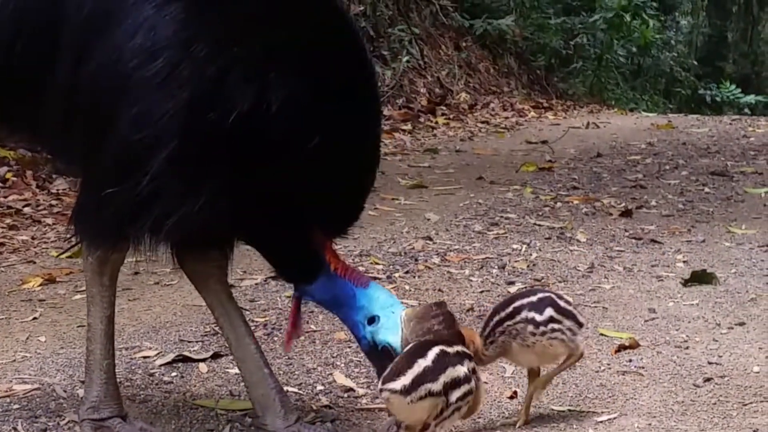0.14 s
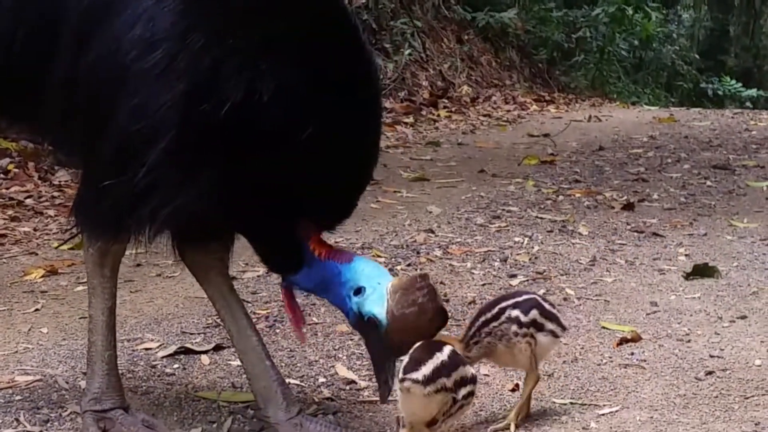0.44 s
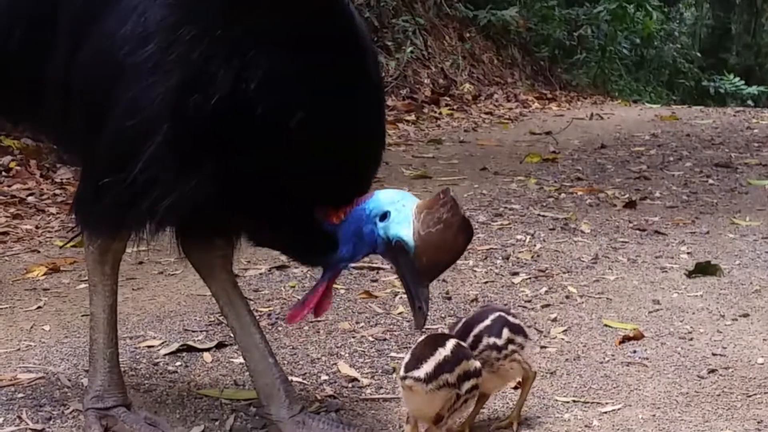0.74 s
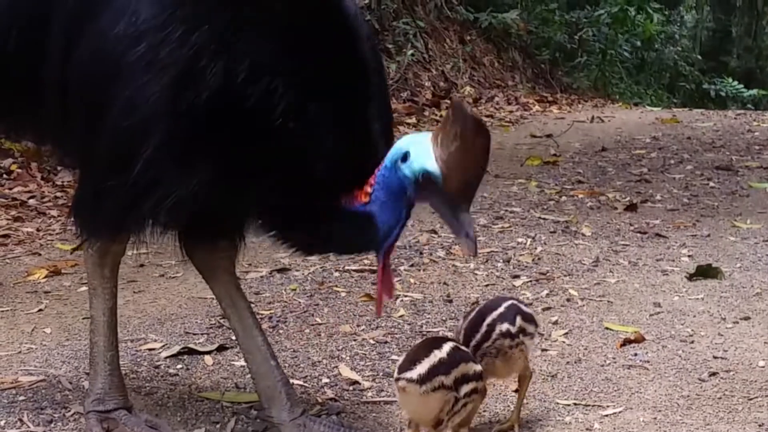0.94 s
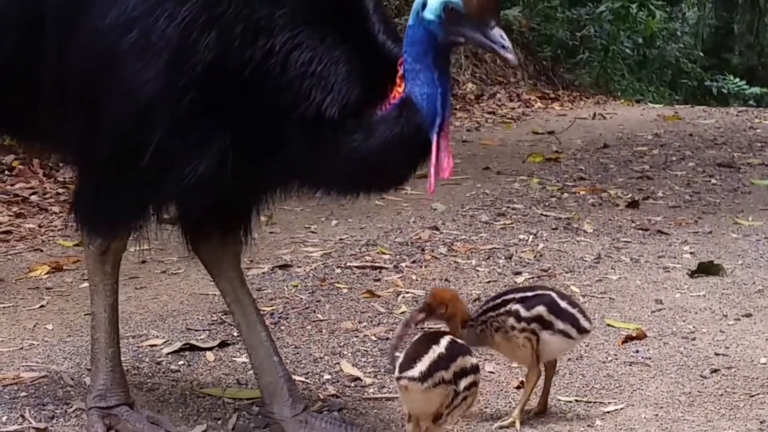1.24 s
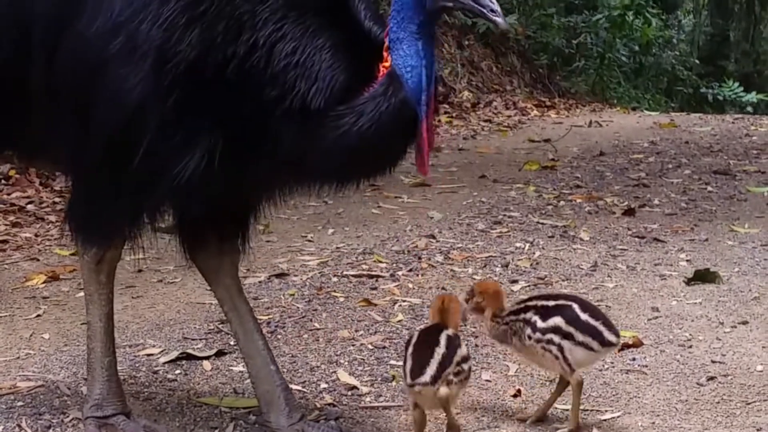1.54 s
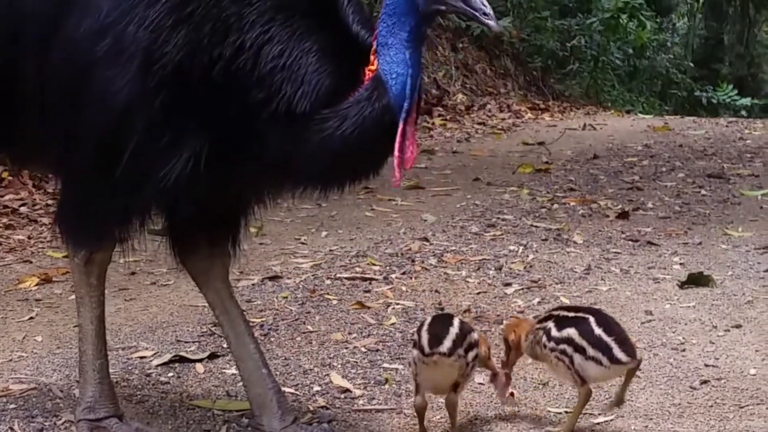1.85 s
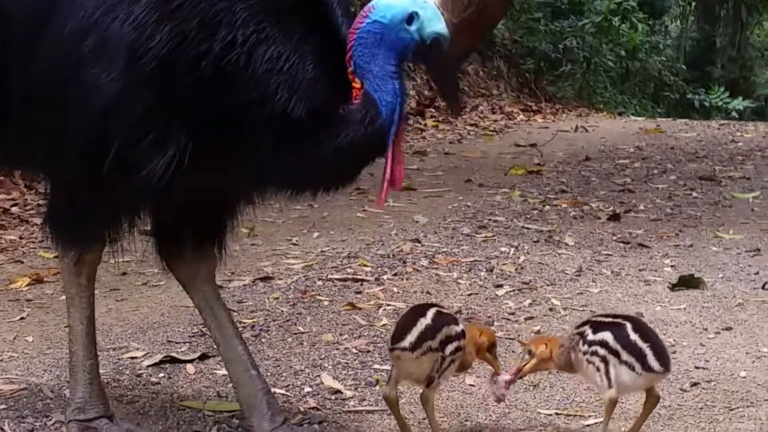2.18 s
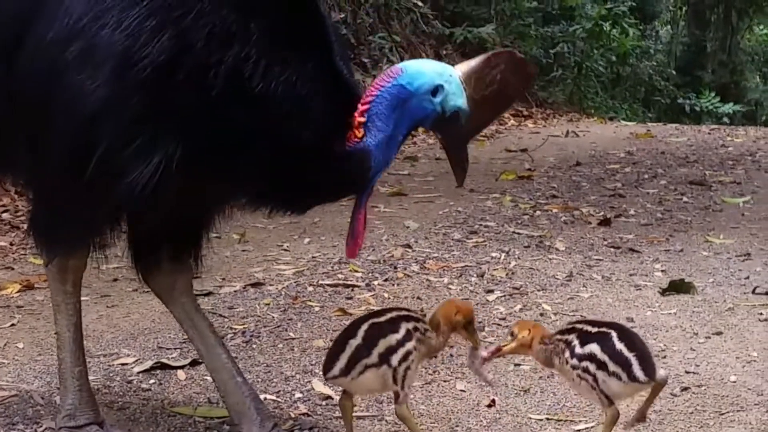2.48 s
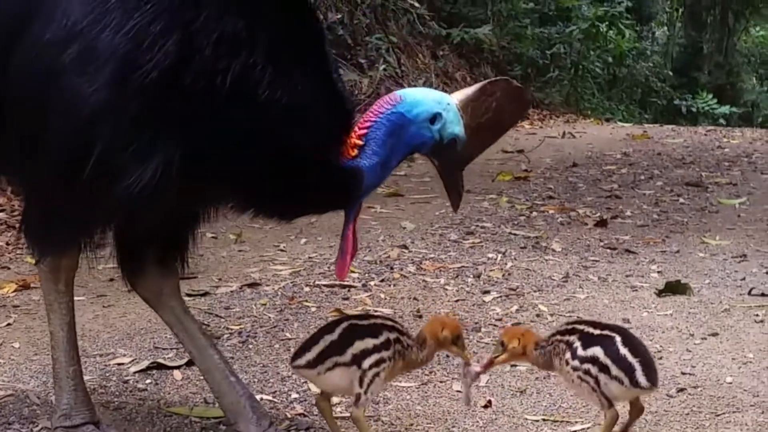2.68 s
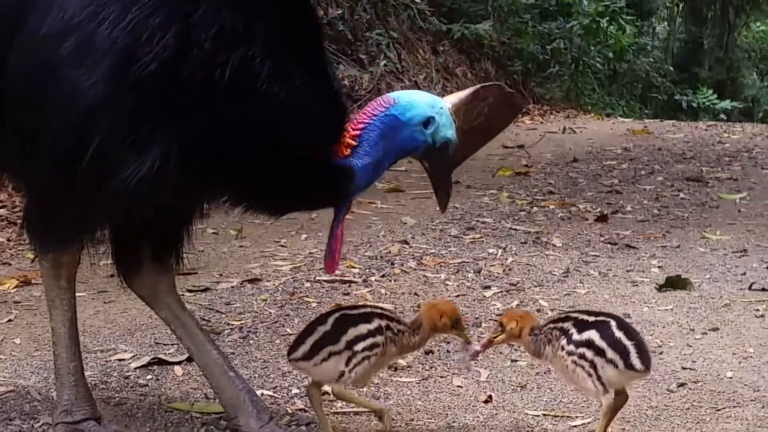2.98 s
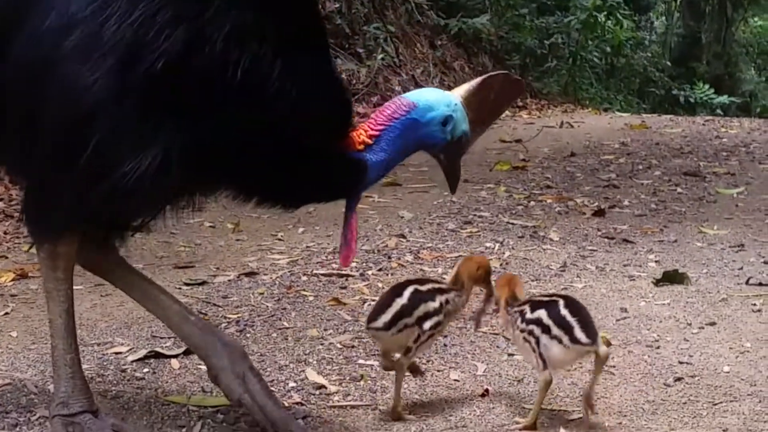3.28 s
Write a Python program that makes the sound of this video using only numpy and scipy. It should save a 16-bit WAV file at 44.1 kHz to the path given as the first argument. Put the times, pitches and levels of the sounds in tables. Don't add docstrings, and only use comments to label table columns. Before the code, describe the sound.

A dense, steady cicada chorus rings at about 4 to 6 kHz throughout, stronger on the left, with faint crickets above and soft forest air. Low wind buffets the stereo microphone in short left lumps and longer right swells, strongest around 1 to 2 seconds. A chick peeps thinly at 0.4, right; faint gravel ticks come at 0.9, 1.9 and 3.3; a large bird hums faintly low at 1.7.

```python
import sys
import numpy as np
from scipy import signal
from scipy.fft import rfft, irfft, next_fast_len
from scipy.io import wavfile
from scipy.ndimage import uniform_filter1d, map_coordinates

SR = 44100
rng = np.random.default_rng(int(sys.argv[2]) if len(sys.argv) > 2 else 0)


def volts(x):
    e = np.asarray(x, float) / 20
    return 10 ** e


def generate_wav(signal):
    frames = np.transpose(np.atleast_2d(signal))
    scaled = np.clip(frames, -1, 1) * 32767
    pcm = np.round(scaled).astype(np.int16)
    wavfile.write(sys.argv[1], SR, pcm)


N = 150822

# centre_hz, width_hz, level_db (per Hz)
CICADAS_LEFT = [(3550, 880, -86.7), (3900, 500, -82.9), (4100, 290, -76.3), (4270, 170, -77.0),
                (4420, 2000, -79.5), (4830, 420, -73.4), (5130, 370, -79.9), (5330, 450, -74.6),
                (5580, 310, -78.1), (5810, 280, -87.3), (6690, 1920, -87.4), (7110, 410, -83.2),
                (7280, 570, -86.3), (7860, 560, -100.4)]
CICADAS_RIGHT = [(3710, 1140, -94.9), (3970, 570, -83.2), (4070, 220, -83.6), (4290, 370, -84.6),
                 (4590, 300, -87.8), (4790, 410, -81.4), (5150, 540, -86.5), (5320, 360, -82.7),
                 (5570, 310, -86.7), (5830, 220, -101.8), (6640, 1660, -102.7), (7130, 320, -99.7),
                 (7230, 920, -103.0)]
# centre_s, length_s, level_db
WIND_LUMPS = [(.04, .09, -29), (.11, .1, -31), (.2, .12, -34), (.345, .07, -24), (.38, .1, -33),
              (.54, .08, -40), (.79, .07, -35), (1.06, .08, -33), (1.17, .08, -38), (1.22, .06, -28),
              (1.39, .09, -29), (1.46, .07, -31), (1.525, .09, -30), (1.8, .14, -33), (1.92, .09, -34),
              (2.01, .1, -32), (2.15, .12, -39), (2.398, .045, -26), (2.49, .09, -39), (2.667, .05, -34),
              (2.76, .08, -43), (3.16, .1, -42), (3.31, .08, -36), (3.37, .07, -34)]
# time_s, level_db
WIND_SWELL = [(0, -34), (.11, -44.5), (.18, -36.5), (.47, -40.5), (.72, -43.5), (1.0, -33.5), (1.1, -38),
              (1.17, -32), (1.44, -30), (1.6, -37.5), (1.77, -31.5), (1.95, -34.5), (2.25, -40.5),
              (2.54, -37), (2.86, -45.5), (3.06, -45), (3.18, -37), (3.42, -42)]
# centre_s, length_s, over_swell_db
WIND_PUFFS = [(0.366, 0.043, 3.5), (0.467, 0.036, 5.5), (0.575, 0.034, 6.5), (0.653, 0.061, 6.5),
              (1.02, 0.029, -6), (1.167, 0.056, -0.5), (1.417, .05, 1), (1.459, 0.015, 8),
              (1.664, 0.031, 2.5), (1.86, 0.039, 2.5), (1.932, .05, 4.5), (2.017, 0.02, 3),
              (2.153, 0.017, 3.5), (2.4, 0.05, 3), (2.704, .06, 2.5), (2.751, 0.07, 4.5),
              (3.205, 0.076, 2.5)]
# freq_hz, level_db (per Hz)
RUMBLE_LEFT = [(12, -20), (30, -8), (45, -4), (75, 0), (110, -4), (160, -11), (210, -21), (400, -50)]
RUMBLE_RIGHT = [(12, -36), (40, -7.5), (70, 2.5), (110, 1), (160, -4.5), (250, -19), (400, -30.5),
                (800, -54)]
# freq_hz, level_db
DEEP_PRESSURE = [(12, -15), (30, -11), (50, -7.5), (80, -8.5), (200, -41)]
# freq_hz, level_db
FLUTTER = [(80, 8), (150, -1), (220, 4), (320, -5.5), (450, -17), (900, -49.5)]
# time_s, pitch_hz, level_db
PEEP = [
    (.354, 1400, -78),
    (.366, 1540, -56),
    (.374, 1720, -70),
    (.386, 1870, -63),
    (.41, 2250, -71),
    (.422, 2120, -80),
    (.437, 2300, -70),
    (.46, 1570, -59),
    (.469, 1480, -76),
]
# start_s, level_db, pitch_hz, left_over_right_db
GRAVEL_TICKS = [
    (.935, -49, 1100, -5),
    (1.882, -54, 12500, -4),
    (1.942, -51, 12500, 1),
    (3.293, -57, 12000, 1),
]
# centre_hz, width_hz, level_db (per Hz)
CRICKET_BANDS = [
    (10950, 3400, -103),
    (10620, 2100, -103),
]
# freq_hz, level_db (per Hz)
AIR_SPECTRUM = [(150, -82), (400, -85), (650, -83.5), (1000, -88.5), (1500, -95.5), (3000, -100),
                (8600, -114), (15000, -112)]
# freq_hz, correlation (0 to 1)
AIR_ALIKE = [(300, 0.98), (700, 0.25), (1400, 0.083), (2000, 0.043)]
# freq_hz, left_over_right_db
AIR_PAN = [(250, 1.5), (600, 2), (1000, 0), (1500, 0), (2300, -4), (6500, 7), (9000, -1.5)]


def unit(x):
    return x / np.sqrt(np.mean(x ** 2, axis=-1, keepdims=True) + 1e-20)


def along(points, hz):
    f, value = np.transpose(points)
    return np.interp(np.log(hz + 1), np.log(f + 1), value)


def wobble(rate_hz):
    knots = rng.standard_normal(int(N * 40 / SR) + 9)
    return map_coordinates(knots, [np.arange(N) * min(rate_hz, 39) / SR])


def filtered(x, response):
    m = next_fast_len(N + SR // 2)
    return irfft(rfft(x, m) * response(np.fft.rfftfreq(m, 1 / SR)), m)[..., :N]


def tymbals(modes, count, sway_db):
    click_rate_hz, rate_spread, click_scatter_db = 240, .06, 2.5
    skirt = 1.6
    t, clicks = np.arange(N) / SR, np.zeros(N)
    for spread, start in rng.standard_normal((count, 2)):
        beats = click_rate_hz * (1 + rate_spread * spread) * t + start + .3 * wobble(30)
        size = volts(click_scatter_db * rng.standard_normal(N)) * rng.choice([-1, 1], N)
        buckles = np.diff(np.floor(beats), prepend=np.floor(beats[0])) != 0
        clicks += buckles * size

    def ring(f):
        power = sum(volts(2 * db) / (1 + (2 * (f - hz) / width) ** 2) ** (2 * skirt) for hz, width, db in modes)
        return np.sqrt(power)

    sway = volts(sway_db * (wobble(11) + wobble(6)))
    return np.sqrt(SR / 2) * filtered(unit(clicks), ring) * sway


def cicadas():
    return np.array([tymbals(modes, count=42, sway_db=.35) for modes in (CICADAS_LEFT, CICADAS_RIGHT)])


def turbulence(spectrum, even_s):
    x = filtered(rng.standard_normal(N), lambda hz: volts(along(spectrum, hz)) * (hz < spectrum[-1][0]))
    span = max(int(even_s * SR), 9)
    power = uniform_filter1d(uniform_filter1d(x ** 2, span), span)
    return unit(x / np.sqrt(np.abs(power) + 1e-20))


def wind_left():
    t, lull_db = np.arange(N) / SR, -48
    power = volts(2 * lull_db)
    for s, length, db in WIND_LUMPS:
        power = power + volts(2 * db) * np.exp(-(4 * (t - s) / length) ** 2)
    return np.sqrt(power) * turbulence(RUMBLE_LEFT, even_s=.025)


def wind_right():
    t = np.arange(N) / SR
    db = np.interp(t, *np.transpose(WIND_SWELL))
    mean_db, swing_db = db.mean(), db - db.mean()
    puff_db = sum(over_db * np.exp(-(2 * (t - s) / length) ** 2) for s, length, over_db in WIND_PUFFS)
    rumble = volts(mean_db + 0.8 * swing_db + puff_db) * turbulence(RUMBLE_RIGHT, even_s=0.035)
    deep = volts(-45.5 + 0.23 * swing_db) * turbulence(DEEP_PRESSURE, even_s=0.073)
    flutter_db = -50.5 + 2.22 * swing_db + puff_db + 1.5 * wobble(18)
    return rumble + deep + volts(flutter_db) * turbulence(FLUTTER, even_s=0.15)


def wind():
    return np.array([wind_left(), wind_right()])


def chick():
    t, (s, hz, db) = np.arange(N) / SR, np.transpose(PEEP)
    phase = 2 * np.pi * np.cumsum(np.interp(t, s, hz)) / SR
    level_db = np.interp(t, s, db, left=-120, right=-120)
    tone = np.sqrt(2) * volts(level_db) * np.sin(phase)
    return tone * volts(np.array([[-8], [4]]))


def gravel():
    t60_s = .007
    out, t = np.zeros((2, N)), np.arange(N) / SR
    for s, db, hz, pan_db in GRAVEL_TICKS:
        decay = (t >= s) * volts(-60 * np.clip(t - s, 0, 1) / t60_s)
        burst = rng.standard_normal((2, N)) * decay
        burst = filtered(burst, lambda f: np.exp(-(np.log((f + 1) / hz) / 0.22) ** 2))
        port_db = db + np.array([[pan_db], [-pan_db]]) / 2
        out += volts(port_db) * burst / np.abs(burst).max()
    return out


def big_bird():
    centre_s, length_s, pitch_hz, level_db = 1.69, 0.05, 243.6, -57
    t = np.arange(N) / SR
    swell = np.exp(-((t - centre_s) / length_s) ** 4)
    return volts(level_db + np.array([[0], [-8]])) * swell * np.sin(2 * np.pi * pitch_hz * t)


def crickets():
    surge_s, surge_length_s, surge_db = 1.68, 0.075, 6
    left, right = [tymbals([band], count=16, sway_db=0.96) for band in CRICKET_BANDS]
    surge = np.exp(-((np.arange(N) / SR - surge_s) / surge_length_s) ** 2)
    return np.array([left, right * volts(surge_db * surge)])


def forest_air():
    def mid_side(hz):
        turn = np.arccos(np.clip(along(AIR_ALIKE, hz), -1, 1)) / 2
        return volts(along(AIR_SPECTRUM, hz)) * (hz > 60) * [np.cos(turn), np.sin(turn)]

    mid, side = filtered(rng.standard_normal((2, N)), mid_side)
    pair = np.array([mid + side, mid - side])
    pair = filtered(pair, lambda hz: volts(along(AIR_PAN, hz) * [[.5], [-.5]]))
    return np.sqrt(SR / 2) * pair * volts(.7 * wobble(7))


def scene():
    return cicadas() + wind() + chick() + gravel() + big_bird() + crickets() + forest_air()


def band_limit(x):
    return signal.sosfilt(signal.butter(12, 15745, fs=SR, output="sos"), x)


def record(dry):
    mix = filtered(dry, lambda hz: hz < 15745)
    return band_limit(mix)


dry = scene()
out = record(dry)
generate_wav(out)
```